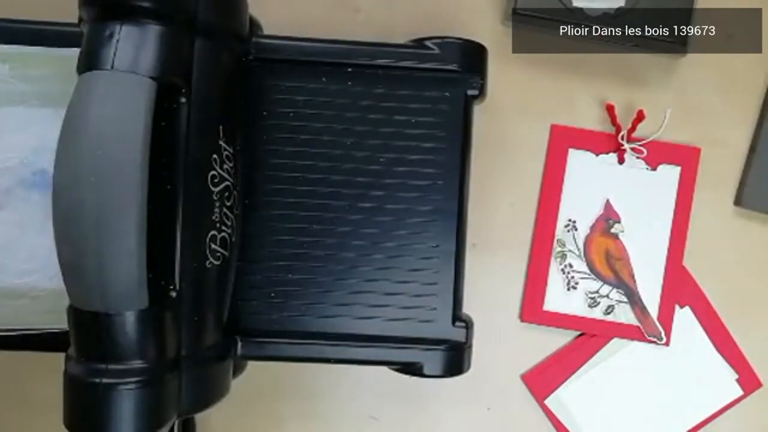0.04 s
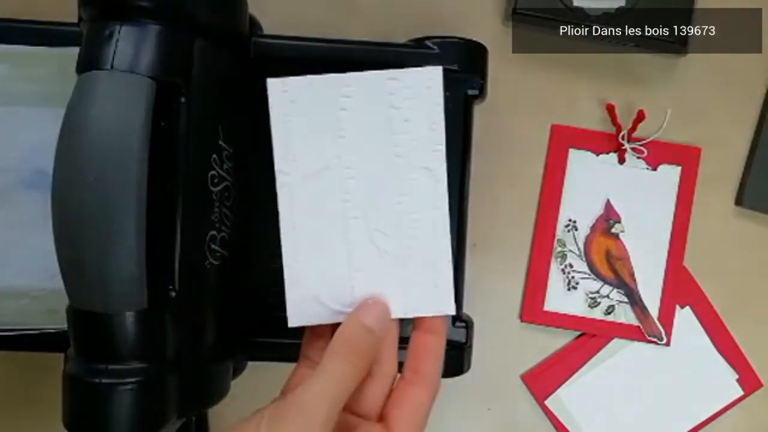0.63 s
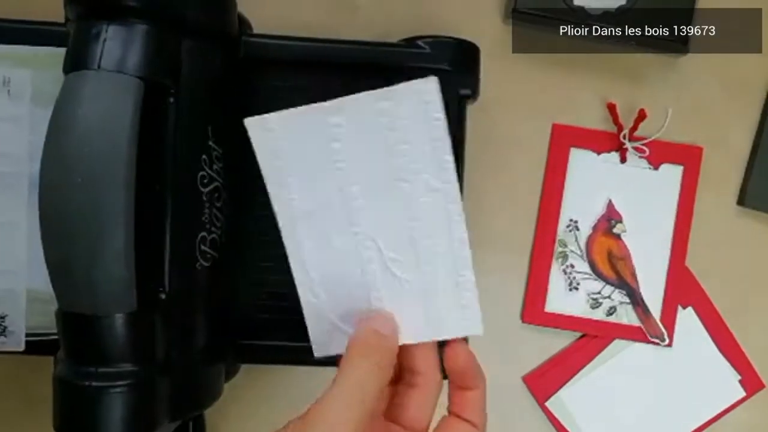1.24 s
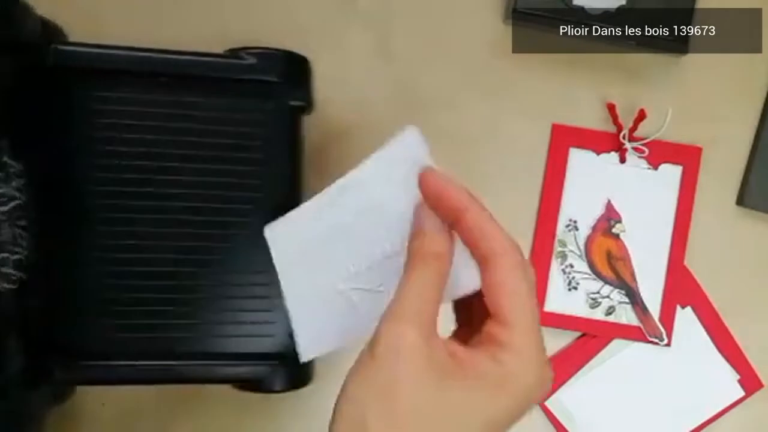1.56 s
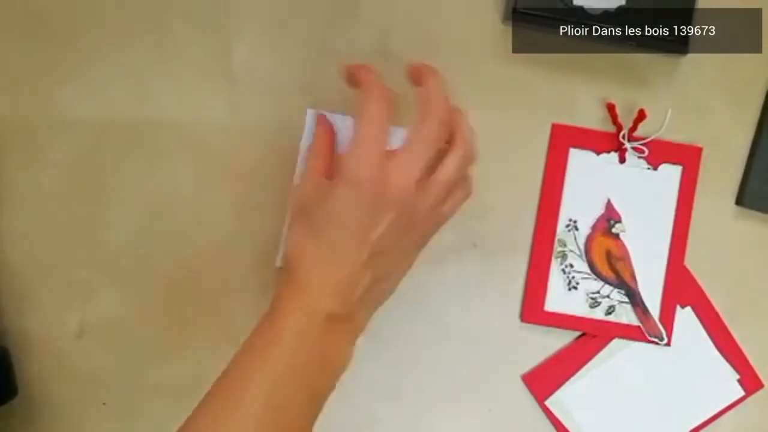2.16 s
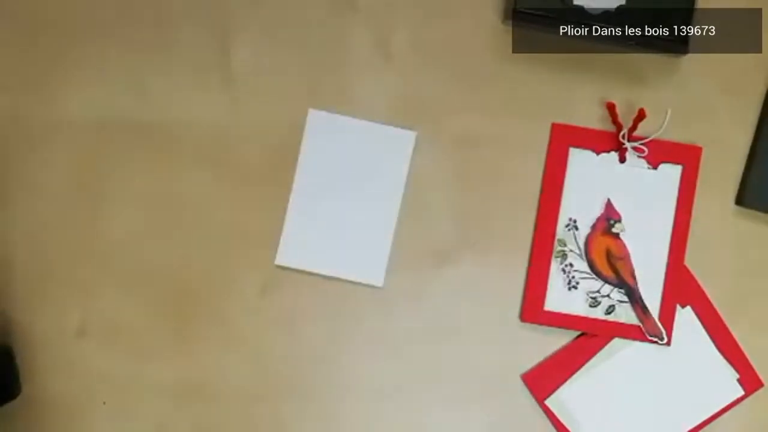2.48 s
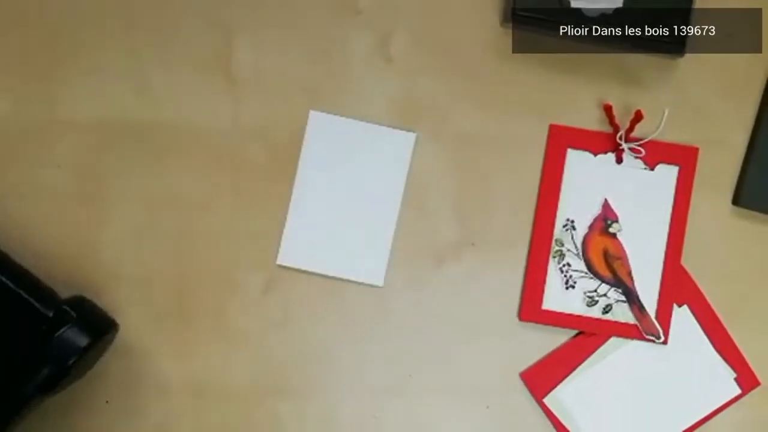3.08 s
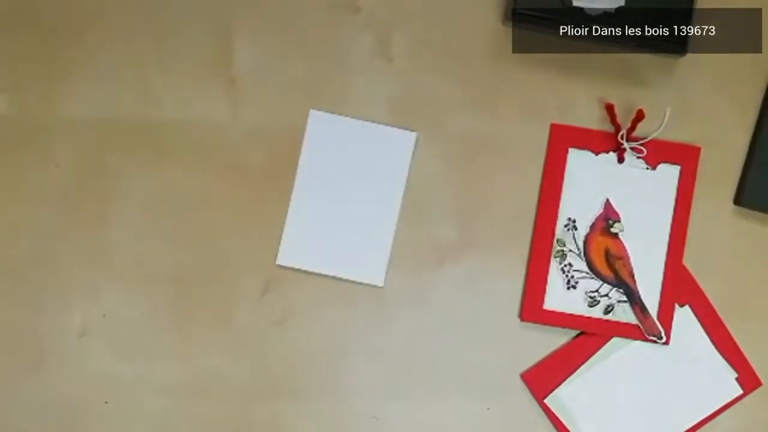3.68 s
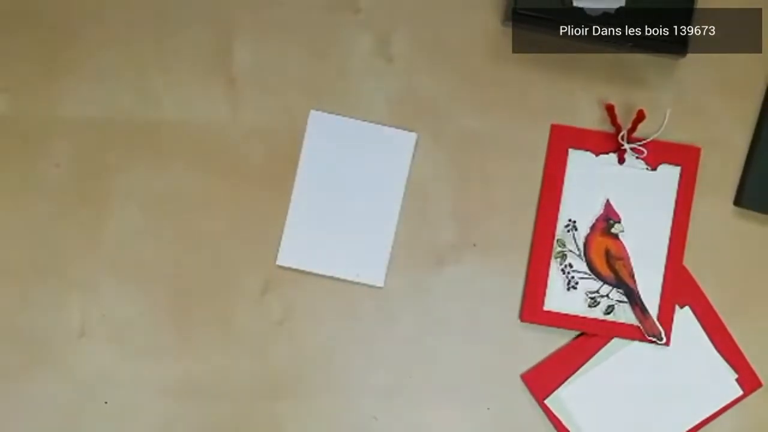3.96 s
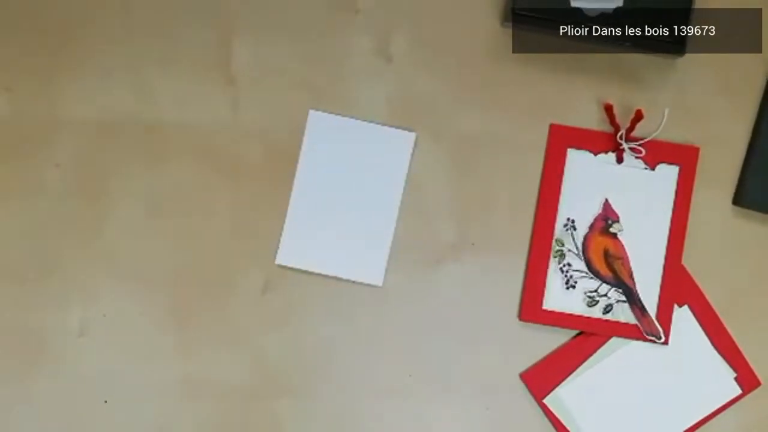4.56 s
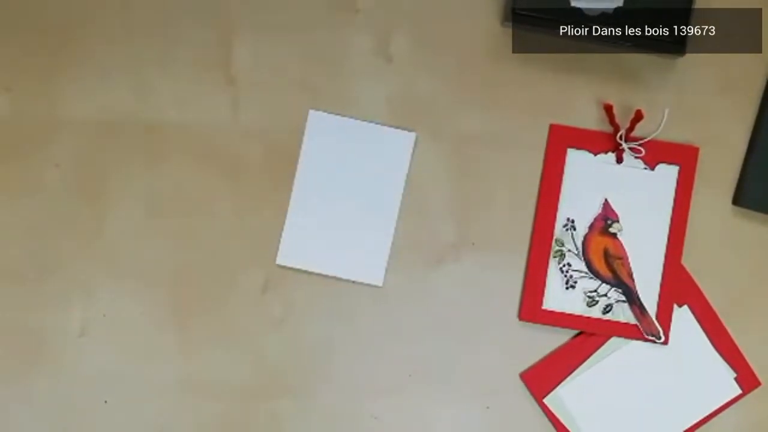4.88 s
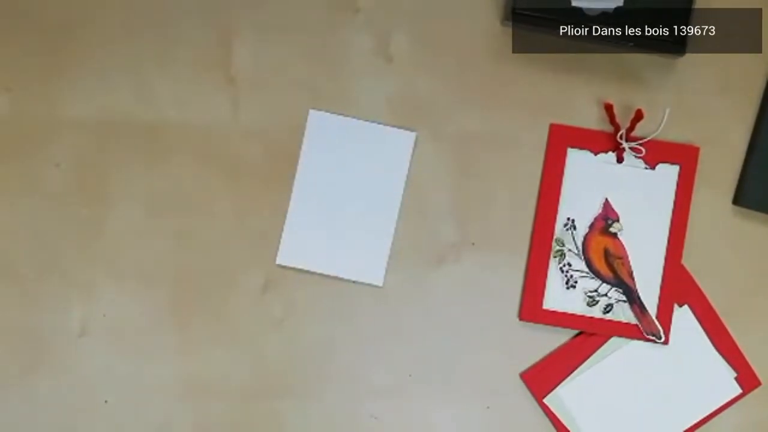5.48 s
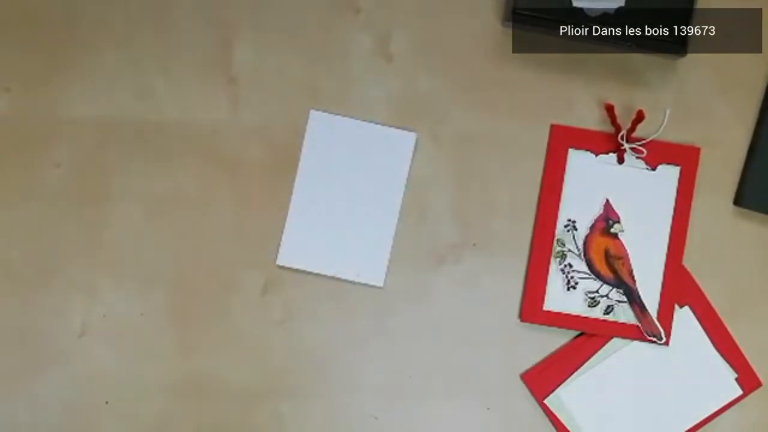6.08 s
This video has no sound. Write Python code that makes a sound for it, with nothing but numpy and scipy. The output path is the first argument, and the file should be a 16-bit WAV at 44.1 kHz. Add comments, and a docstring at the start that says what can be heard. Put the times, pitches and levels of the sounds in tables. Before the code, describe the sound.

In the first half second, stiff card rustles out of a folder close to the microphone, with several dry snaps. At about 0.7 seconds comes a sharp, clattering tap on the tray of a hollow plastic embossing machine, followed by lighter knocks and rattles. From 1.1 to 2.3 seconds its feet scrape across a wooden desk, swelling into a hiss. Around 2.6 seconds it thumps, its plates and crank clink, and a shorter scrape lasts until 3.2 seconds. Faint finger taps, scuffs and sleeve rustle follow as it is lifted, with a thin, faint squeak near 4.4 seconds. At about 4.7 seconds it is set down further away with a sharp clack and woody thud, the loudest sound, ringing briefly in the small, live room. Only a few faint scuffs and quiet room hiss remain until a little after 6 seconds.

```python
"""Embossing machine on a wooden desk

Close to the microphone, embossed card rustles out of its folder and is tapped on the machine's tray.
The hollow plastic machine knocks as it is gripped, its plates and crank rattle, and its feet scrape
over the desk. It is dragged off, lifted, and set down with a sharp clack further away in a small,
live room."""
import sys
import numpy as np
from scipy import signal
from scipy.fft import rfft, irfft
from scipy.io import wavfile
from scipy.ndimage import uniform_filter1d

SR = 44100
rng = np.random.default_rng(int(sys.argv[2]) if len(sys.argv) > 2 else 0)


def dump(signal):
    """Clip the signal to [-1, 1] and save it as 16-bit WAV at the path in sys.argv[1]."""
    limited = np.clip(np.atleast_2d(signal).T, -1, 1)
    pcm = np.round(limited * 32767).astype(np.int16)
    wavfile.write(sys.argv[1], SR, pcm)


N = 278712


# pushes across the desk: start/s, fastest/s, end/s, top speed/0-1, weight on the feet/dB, lean/s
PUSHES = [(1.141, 1.862, 2.287, 0.92, -0.5, 0.31), (2.654, 3.08, 3.23, 0.4, 2.5, 0.012)]
def pushes(knee_speed=0.28):
    """Speed and gains of drone, scrape and hiss: slow feet judder and drone, fast ones glide and hiss."""
    t, total_speed, gains = np.arange(N) / SR, np.zeros(N), np.zeros((3, N))
    for start, fastest, end, top_speed, weight_db, lean_s in PUSHES:
        speed = top_speed * arch(t, start, fastest, end) ** 1.02
        progress = np.interp(t, (start, end), (0, 1))
        lean = arch(t, start - lean_s, (start + end) / 2, end + lean_s)  # the hand bears down
        drone = amp(-61 - 10 * speed) * np.sqrt(lean)
        scrape = amp(-54 - 7 * progress) * speed ** 2 / (speed ** 2 + knee_speed ** 2)
        hiss = amp(-39) * speed ** 2.09
        gains += amp(weight_db) * np.array([drone, scrape, hiss])
        total_speed += speed
    return total_speed, gains


# spectra of the feet and of the grit under them, close up: f/Hz, level/dB
FEET_COLOUR = [(50, -7), (130, -18), (300, -11.5), (400, -9.5), (480, -10.5), (840, -1.5), (1180, -8.5),
               (1500, -12.5), (1750, -9), (2000, -14.5), (4500, -14), (7400, -8.5), (8200, -5), (8900, 3),
               (9400, -2), (10300, -9), (14400, -27)]
GRIT_COLOUR = [(300, -21), (700, -10), (1150, -2), (1800, -2), (2500, -1), (3500, -3), (8000, -26)]
def sliding_feet(drone, scrape, hiss):
    """The feet rub over the wood in dense slips; sparser grit roughens the scrape."""
    feet = rub((drone, scrape, hiss), FEET_COLOUR, (300, 1500),
               grains_per_s=20000, grain_db=1.3, flutter_db=0.9, ring_db=-53)
    grit = rub((0, scrape, 0), GRIT_COLOUR, (400, 3000),
               grains_per_s=450, grain_db=2.5, flutter_db=2.5, ring_db=-60)
    return feet + amp(-5) * grit


# resonances of the sliding shell: f/Hz, width/Hz, level over drone/dB, level over scrape/dB
HUM_MODES = [(179, 21, -3.5, -50), (388, 18, -11, -10.5), (1810, 190, -44, -27)]
def shell_hum(drone, scrape):
    """The juddering, scraping feet keep the shell ringing."""
    return sum(fuzzy_tone(hz, width) * (amp(drone_db) * drone + amp(scrape_db) * scrape)
               for hz, width, drone_db, scrape_db in HUM_MODES)


# feet and fingers catching, and the crank ringing on: t/s, length/s, level/dB, f/Hz, width/Hz
RASPS = [(0.0, 0.036, -58, 1503, 70), (0.161, 0.052, -63.5, 820, 200), (0.394, 0.047, -64, 847, 200),
         (1.325, 0.057, -50, 725, 120), (1.357, 0.079, -52.5, 620, 59), (1.36, 0.3, -61.5, 1690, 40),
         (1.381, 0.23, -54.5, 1992, 2100), (1.42, .15, -66, 830, 97), (1.56, 0.13, -59.5, 400, 5.2),
         (1.61, 0.1, -57, 1870, 120), (1.721, 0.11, -51.5, 1700, 43), (1.87, 0.23, -58, 1080, 640),
         (2.683, 0.048, -49, 2313, 70), (2.739, 0.061, -46, 830, 330), (4.579, 0.032, -56, 3500, 700),
         (4.683, 0.042, -41, 667, 300), (5.789, 0.049, -68, 751, 580)]
def rasps():
    """A foot or finger sticks and slips, or the crank rings on: a fuzzy resonance swells and fades."""
    out, t = np.zeros(N), np.arange(SR // 3) / SR
    for s, seconds, db, hz, width in RASPS:
        swell = np.sin(np.pi * np.clip(t / seconds, 0, 1))
        add(out, s, sized(swell * fuzzy_tone(hz, width, size=len(t)), db, span=seconds / 2))
    return out


# the machine set down edge first, away from the microphone: t/s, level/dB, contact/s
LANDING_BLOWS = [(4.7302, -24.5, 0.011), (4.7396, -14.5, 0.0045), (4.7452, -20, 0.0067),
                 (4.752, -24, 0.0078), (4.762, -29.5, 0.0029), (4.772, -33, 0.0048), (4.803, -26.5, 0.023)]
# spectrum of the clack: f/Hz, level/dB
CLACK_COLOUR = [(40, -10), (100, -9), (160, -21.5), (250, -9.5), (420, -4.5), (620, -2.5), (850, -1),
                (1100, -5.5), (1900, -2.5), (2600, -0.5), (3400, 0), (4600, -2.5), (7700, -1.5),
                (9100, 6.5), (10000, -8.5), (10900, -13), (14400, -26)]
def landing():
    """The heavy machine meets a hard surface in a few blows, with much of the room at this distance."""
    out, t = np.zeros(N), np.arange(SR // 4) / SR
    for s, db, seconds in LANDING_BLOWS:
        blow = touch(contact(t, seconds / 2), ring_db=-17, rise_s=seconds)
        add(out, s, sized(blow, db, span=0.0036))
    response = colour(CLACK_COLOUR)
    clack = through(out, response / np.linalg.norm(response))
    return room(clack, early_db=-5.5, early_t60=0.073, late_db=-4.5)


# the surface under the landing: f/Hz, level/dB, t60/s
SURFACE_MODES = [(406, -3.5, 0.27), (550, 6.5, 0.097), (804, -3, 0.13), (889, -9, .27), (1135, -10, .2),
                 (1480, -5, 0.14), (1685, -7, 0.099), (1886, -2, 0.15), (3362, -2, 0.185)]
def surface_thud(start_s=4.742, rise_s=0.002):
    """The surface answers with a woody thud as the full weight arrives."""
    out, t = np.zeros(N), np.arange(SR // 2) / SR
    add(out, start_s, sized(ringing(SURFACE_MODES, t) * (1 - np.exp(-t / rise_s)), db=-28))
    return room(out, early_db=-19, early_t60=0.084, late_db=-15)


# plates and shell knocking near the microphone: t/s, thud/dB, body/dB, crack/dB, relative rattle/dB
KNOCKS = [(0.7248, -35.5, -38.5, -46, -1), (0.915, -44.5, -44, -64.5, 0.5), (0.94, -48, -51.5, -69, -20),
          (1.141, -50.5, -54.5, -67.5, -13), (1.204, -57, -48.5, -61.5, -15),
          (1.238, -48.5, -46.5, -59.5, -24), (1.276, -52, -52.5, -70.5, -6), (1.324, -66, -51, -64.5, -11),
          (2.254, -57, -56.5, -79, -24), (2.349, -72, -63.5, -77, -26), (2.587, -55, -39, -52, -14),
          (2.7399, -63, -33.5, -51, -25), (2.776, -64, -49, -71, -29), (3.914, -51.5, -58.5, -63, -20)]
RATTLE_S = 0.017  # the chatter of loose parts peaks this long after a blow
def knocks(contact_s=0.0031, rebound_s=0.011, firm_db=-54.5):
    """The handled machine knocks, rattles and bounces once; harder knocks are brighter."""
    out, t = np.zeros(N), np.arange(SR // 4) / SR
    for s, thud_db, body_db, crack_db, rattle_db in KNOCKS:
        tick_db = crack_db + 11.5 + 0.49 * (crack_db - firm_db)
        force = contact(t, contact_s) + amp(rattle_db) * contact(t, RATTLE_S)
        for delay, db in (0, -0.5), (rebound_s, -8.5):
            blow = strike(force, (thud_db, body_db, crack_db, tick_db), ring_db=-12.5, rise_s=0.00029)
            add(out, s + delay, amp(db) * blow)
    return out


# the machine's weight rocking on the desk: t/s, level/dB, f/Hz, t60/s
DESK_THUMPS = [(0.511, -51.5, 80, 0.17), (0.7257, -38.5, 101, 0.14), (0.726, -42.5, 249, 0.13),
               (0.728, -39, 428, .09), (0.7275, -37.5, 536, 0.098), (0.931, -48, 120, 0.13),
               (0.944, -39, 396.6, 0.19), (0.947, -47, 193, 0.22), (1.206, -45, 375, 0.14),
               (1.213, -46, 181, 0.46), (2.588, -42.5, 81.5, 0.16), (2.588, -37.5, 414, 0.1),
               (2.589, -40, 505, 0.094), (2.592, -36.5, 181.4, 0.17), (2.743, -38, 163, 0.17),
               (3.906, -51.5, 133, 0.16), (4.746, -37, 115, 0.1), (4.747, -42, 158, 0.15)]
def desk_thumps(rise_s=0.002):
    """The desk top answers the weight with a short, low boom."""
    out, t = np.zeros(N), np.arange(SR // 3) / SR
    for s, db, hz, t60 in DESK_THUMPS:
        boom = ringing([(hz, 0, t60)], t) * (1 - np.exp(-t / rise_s))
        add(out, s, sized(boom, db))
    return room(out, early_db=-10, early_t60=0.06, late_db=-16)


# the stacked cutting plates and the crank handle: f/Hz, level/dB, t60/s
PLATE_MODES = [(465, 7, 0.029), (545.6, 5.5, 0.048), (690, -5, 0.11), (1040, -22, 0.077), (1304, 1, 0.037),
               (1620, -8, 0.072), (3050, -21.5, 0.14), (3420, -16.5, 0.12), (4220, -24, .12)]
CRANK_MODES = [(903, -1.5, 0.13), (2256, -10, 0.091), (2368, 4, .07), (3010, -4, 0.077), (3570, 0, 0.08),
               (3870, 0, 0.049)]
# their claps and clinks: t/s, level/dB, contact/s
PLATE_CLAPS = [(0.7284, -30, 0.00026), (0.916, -45, 0.00034), (1.325, -51.5, 0.00035),
               (2.5908, -52, 0.0002), (2.7411, -51, 0.0043), (2.758, -40, 0.0027), (2.776, -41.5, 0.00043),
               (2.797, -50, 0.0014), (2.824, -50, 0.0017)]
CRANK_CLINKS = [(2.252, -57.5, 0.0012), (2.523, -59, 0.0019), (2.571, -65, 0.0023), (2.589, -43, 0.0022),
                (2.692, -44.5, 0.011)]
def plates_and_crank():
    """Close to the microphone, the plates clap together and the loose crank clinks on its shaft."""
    parts = loose_part(PLATE_MODES, PLATE_CLAPS) + loose_part(CRANK_MODES, CRANK_CLINKS)
    return room(parts, early_db=-9, early_t60=0.04, late_db=-13)


# strokes of card on folder and fingers: t/s, hold/s, rustle/dB, hiss/dB
CARD_STROKES = [(-0.02, 0.012, -54.5, -47.5), (0.11, 0.15, -68, -54), (0.485, 0.026, -58.5, -59)]
# spectrum of rubbing card, close up: f/Hz, level/dB
CARD_COLOUR = [(120, -22), (180, -13), (313, -24), (395, -14), (517, -21.5), (753, -19.5), (1240, -21.5),
               (2890, -4), (6030, -4), (8940, 8), (14500, -15)]
def card_rustle():
    """Card rubs out of its folder in strokes that take hold quickly."""
    return rub(strokes(CARD_STROKES, rise_s=0.011), CARD_COLOUR, (1300,),
               grains_per_s=4200, grain_db=1, flutter_db=-1.5, ring_db=-57)


# snaps of the card's edge: t/s, level/dB
CARD_SNAPS = [(0.0932, -65), (0.111, -56), (0.2325, -41), (0.2483, -39.5), (0.2535, -42), (0.5124, -32),
              (0.547, -57), (0.5672, -45.5), (0.5825, -59)]
# spectrum of a snap: f/Hz, level/dB
SNAP_COLOUR = [(150, -18), (700, -21), (1500, -13.5), (3000, -15), (6000, -11), (7800, -5.5), (8900, 6.5),
               (10300, -6.5), (14400, -26)]
def card_snaps(contact_s=0.00046):
    """Stiff card snaps past the folder in dry ticks, close to the microphone."""
    out, t = np.zeros(N), np.arange(SR // 20) / SR
    for s, db in CARD_SNAPS:
        burst = flatten(contact(t, contact_s) * rng.standard_normal(len(t)))
        add(out, s, sized(through(burst, colour(SNAP_COLOUR)), db))
    return room(out, early_db=-7, early_t60=0.04, late_db=-18)


# card edge and fingernails on the plastic, close up: t/s, body/dB, tick/dB, contact/ms
CLICKS = [(0.01, -56, -52.5, 1.2), (0.029, -56.5, -77, 1.8), (0.464, -58.5, -63.5, 1.7),
          (0.512, -56, -38, 2.9), (0.567, -58, -57, 1.3), (0.727, -58, -30.5, 0.24),
          (0.737, -78, -35, 0.57), (0.744, -70, -40, 0.36), (2.1646, -56.5, -39.5, 2.9),
          (2.865, -55, -50.5, 2.6), (3.387, -60.5, -51, 1.8), (3.874, -60, -65, 2.7),
          (5.416, -79, -62, 2.4)]
def clicks():
    """A hard edge clicks on the shell, with a faint rattle after it."""
    out, t = np.zeros(N), np.arange(SR // 4) / SR
    for s, body_db, tick_db, contact_ms in CLICKS:
        force = contact(t, contact_ms / 1000) + amp(-25) * contact(t, RATTLE_S)
        levels_db = light_levels(body_db, tick_db, thud_over_body_db=-4)
        add(out, s, strike(force, levels_db, ring_db=-10.5, rise_s=0.0012))
    return out


# scuffs of card, fingers and plastic: t/s, body/dB, tick/dB, length/s
SCUFFS = [(0.09, -61, -50, 0.0078), (0.153, -61.5, -65, 0.014), (0.224, -55, -41, 0.03),
          (0.241, -58.5, -45, 0.017), (0.384, -54.5, -72, 0.068), (0.694, -55, -91, 0.041),
          (1.617, -77, -41, 0.052), (2.156, -65, -43.5, 0.017), (2.42, -76, -57.5, 0.087),
          (2.571, -53.5, -62, 0.028), (2.687, -46, -35.5, 0.057), (3.108, -57.5, -48, 0.12),
          (3.365, -66, -68, 0.016), (4.327, -57, -60, .11), (4.565, -51.5, -48, 0.27),
          (4.681, -43, -39, 0.1), (5.407, -78, -49.5, 0.093), (5.967, -97, -55, 0.15)]
def scuffs():
    """A soft, glancing touch on the shell swells and fades."""
    out, t = np.zeros(N), np.arange(SR // 4) / SR
    for s, body_db, tick_db, seconds in SCUFFS:
        rise_s = seconds / 4
        levels_db = light_levels(body_db, tick_db, thud_over_body_db=-11)
        add(out, s, strike(contact(t, rise_s), levels_db, ring_db=-13, rise_s=rise_s))
    return out


# fingers on the hollow casing: t/s, ring/dB, f/Hz, click/dB
FINGER_TAPS = [(0.607, -57, 776, -79), (2.496, -61, 670, -64), (2.524, -57.5, 943, -61),
               (3.211, -58.5, 930, -62), (3.239, -52, 538, -70), (3.339, -63.5, 856, -64),
               (3.508, -56.5, 810, -59), (3.553, -54, 887, -58.5), (3.673, -63.5, 856, -77),
               (3.915, -54, 743, -65.5), (3.986, -72, 920, -59), (4.075, -69.5, 965, -61),
               (4.138, -64.5, 1710, -77), (4.263, -70.5, 1290, -63), (4.451, -63, 880, -65.5),
               (4.481, -59.5, 667, -72), (4.56, -61.5, 844, -59)]
# modes of a tapped panel: multiple of f, level/dB
PANEL_MODES = [(.69, -9), (1, 0), (1.17, -7), (1.52, -10)]
# spectrum of a fingertip's click: f/Hz, level/dB
TAP_COLOUR = [(150, -8.5), (600, 2.5), (1200, -2), (2200, -8), (3400, -5.5), (5000, -18), (7500, -12),
              (9000, -7), (10500, -20), (14400, -28)]
def finger_taps(t60=0.075, contact_s=0.0037):
    """A fingertip rings one panel of the casing for a moment, with a dry click."""
    out, t = np.zeros(N), np.arange(SR // 5) / SR
    for s, ring_db, hz, click_db in FINGER_TAPS:
        ring = ringing([(hz * multiple, db, t60) for multiple, db in PANEL_MODES], t)
        click = through(contact(t, contact_s) * rng.standard_normal(len(t)), colour(TAP_COLOUR))
        add(out, s, sized(ring, ring_db) + sized(click, click_db))
    return room(out, early_db=-8, early_t60=0.06, late_db=-11)


def grip_squeak(start_s=4.347, hz=10800, half_width_hz=300, db=-51, t60=0.4):
    """Plastic slips in the grip: a thin, fuzzy whistle that dies away."""
    out, t = np.zeros(N), np.arange(SR // 3) / SR
    blur = signal.butter(3, half_width_hz, fs=SR, output="sos")
    real, imaginary = signal.sosfilt(blur, rng.standard_normal((2, len(t))))
    whistle = evened(((real + 1j * imaginary) * np.exp(2j * np.pi * hz * t)).real)
    add(out, start_s, whistle * amp(db - 60 * t / t60))
    return out


# hands and sleeves, further from the microphone: t/s, hold/s, rustle/dB, hiss/dB
SLEEVE_STROKES = [(3.2, 0.66, -74, -70.5), (3.88, 0.77, -69, -67), (4.3, 0.63, -65.5, -66),
                  (5.55, 0.61, -84.5, -73), (6.25, 0.1, -79, -60)]
# their spectrum: f/Hz, level/dB
SLEEVE_COLOUR = [(150, -26.5), (300, -7), (420, -0.5), (900, 1.5), (1100, -12), (2100, -11.5),
                 (3500, -11.5), (5600, -16.5), (7600, -16), (8950, -1), (10300, -13.5), (14400, -29)]
def hands_and_sleeves():
    """Hands and sleeves rub softly as they change their hold on the machine."""
    return rub(strokes(SLEEVE_STROKES, rise_s=0.06), SLEEVE_COLOUR, (1300,),
               grains_per_s=5000, grain_db=-0.5, flutter_db=3.5, ring_db=-65.5)


# the hollow plastic shell: f/Hz, level/dB, t60/s
SHELL_MODES = [(86.7, 7, 0.11), (129, -1, 0.044), (175, 2, 0.67), (399, 4, 0.22), (525.5, 7, 0.12),
               (628.5, 11, 0.051), (699, 3.5, 0.17), (774, 2, 0.18), (871.5, -2, 0.6), (1100, -16, 0.17),
               (1312, -5, 0.23), (1704, 4.5, 0.038), (2286, 5, 0.19), (3525, 1.5, 0.15), (3870, 1.5, 0.12),
               (4350, -5, 0.13), (5850, -9, 0.21), (7740, -1, 0.092)]
def shell(spot_db=0):
    """The shell rings after a touch; spot_db lets each spot favour other modes."""
    t = np.arange(SR // 4) / SR
    spots = rng.uniform(-0.68, 1, (len(SHELL_MODES), 2))
    return sum(amp(db + spot_db * share - 60 * t / t60) * np.cos(2 * np.pi * hz * t + np.pi * turn)
               for (hz, db, t60), (share, turn) in zip(SHELL_MODES, spots))


# spectrum of a blow near the microphone: f/Hz, level/dB
BLOW_COLOUR = [(40, -6.5), (90, 2.5), (200, -2), (330, 1.5), (600, 5.5), (1100, 0.5), (2000, 2), (3500, 1),
               (6500, -9.5), (7800, -6), (9000, 3.5), (10200, -10), (12500, -19.5), (14500, -29)]
def strike(force, levels_db, ring_db, rise_s):
    """A near touch in four bands: thud, body, crack and tick."""
    blow = through(touch(force, ring_db, rise_s), colour(BLOW_COLOUR))
    return sum(sized(band, db) for band, db in zip(split(blow, (250, 1200, 6500)), levels_db))


def light_levels(body_db, tick_db, thud_over_body_db):
    """Thud, body, crack and tick levels of a light touch."""
    crack_db = body_db + 0.28 * (tick_db - body_db) - 0.5
    return body_db + thud_over_body_db, body_db, crack_db, tick_db


def touch(force, ring_db, rise_s, grip_t60=0.3):
    """A burst of rough contact, and the shell ringing under it, damped by the hand."""
    t = np.arange(len(force)) / SR
    burst = flatten(force * rng.standard_normal(len(t)))
    ring = shell(spot_db=3)[:len(t)] * (1 - np.exp(-t / rise_s)) * amp(-60 * t / grip_t60)
    return sized(burst, 0) + sized(ring, ring_db)


def loose_part(modes, hits):
    """A loose part rings with its own modes; a longer contact is a run of tiny bounces."""
    out, t = np.zeros(N), np.arange(SR // 3) / SR
    ring = ringing(modes, t)
    for s, db, seconds in hits:
        bounces = flatten(flatten(contact(t, seconds) * rng.standard_normal(len(t))))
        add(out, s, sized(through(bounces, ring), db))
    return out


def rub(gains, spectrum, edges_hz, grains_per_s, grain_db, flutter_db, ring_db):
    """Tiny slips of uneven size excite the shell; each band follows its own gain."""
    sizes = amp(grain_db * np.minimum(rng.exponential(1, N), 5)) * rng.standard_normal(N)
    flutter = evened(uniform_filter1d(uniform_filter1d(rng.standard_normal(N), size=700), size=400))
    slips = sizes * (rng.random(N) < grains_per_s / SR) * amp(flutter_db * flutter)
    sound = through(slips + amp(ring_db) * through(slips, shell()), colour(spectrum))
    return sum(evened(band) * gain for band, gain in zip(split(sound, edges_hz), gains))


def strokes(rows, rise_s, fade_db_per_s=189):
    """Gains of rustle and hiss over time: each stroke rises, holds and fades."""
    t, gains = np.arange(N) / SR, np.zeros((2, N))
    for s, hold, *levels_db in rows:
        shape = np.clip((t - s) / rise_s, 0, 1) * amp(-fade_db_per_s * np.maximum(t - s - hold, 0))
        gains = np.maximum(gains, amp(levels_db)[:, None] * shape)
    return gains


def shifting_echoes(near, speed, turns_per_s=2.76):
    """The desk's echo pattern changes as the machine travels, by turns_per_s at speed 1."""
    travel = 2 * np.pi * turns_per_s * np.cumsum(speed) / SR
    return sum(room(part, early_db=-4, early_t60=0.02, late_db=-17) - part
               for part in (near * np.cos(travel), near * np.sin(travel)))


# decay of the small, live room: f/Hz, t60/s
ROOM_DECAY = [(100, 0.82), (300, 0.58), (1000, 0.71), (2500, 0.59), (5000, 0.52), (9000, 0.43),
              (14000, 0.4)]
def room(x, early_db, early_t60, late_db):
    """The microphone hears the direct sound, quick echoes from desk and furniture, and the tail."""
    t = np.arange(SR) / SR
    hz, s, noise = signal.stft(rng.standard_normal(SR), SR, nperseg=256)
    late = signal.istft(noise * amp(-60 * s / read(ROOM_DECAY, hz)[:, None]), SR, nperseg=256)[1][:SR]
    late *= np.clip((t - 0.004) / 0.0082, 0, 1)
    early = rng.standard_normal(SR) * (rng.random(SR) < 2500 / SR)
    early *= (t > 0.0015) * amp(-60 * t / early_t60)
    echoes = amp(early_db) * early / np.linalg.norm(early) + amp(late_db) * late / np.linalg.norm(late)
    return x + through(x, echoes)


# spectrum of the still room at the microphone: f/Hz, level/dB
ROOM_TONE_COLOUR = [(12, -33.5), (20, 2.5), (62, 4), (114, 1.5), (181, -3.5), (463, -5), (662, -6.5),
                    (922, -7), (1030, -14.5), (3660, -16), (6700, -15.5), (9080, -4), (10400, -13),
                    (14500, -21.5)]
def room_tone(db=-65.5):
    """Quiet room air and microphone hiss."""
    return amp(db) * evened(through(rng.standard_normal(N), colour(ROOM_TONE_COLOUR)))


def contact(t, seconds):
    """The force of a touch: a quick rise and a fall."""
    u = t / max(seconds, 0.0003)
    return u * np.exp(1 - u)


def ringing(modes, t):
    """Modes that start together and die away."""
    return sum(amp(db - 60 * t / t60) * np.sin(2 * np.pi * hz * t) for hz, db, t60 in modes)


def fuzzy_tone(hz, width_hz, size=N):
    """A narrow resonance kept ringing by friction."""
    blur = signal.butter(2, width_hz / 2, fs=SR, output="sos")
    real, imaginary = signal.sosfilt(blur, rng.standard_normal((2, size)))
    phase = 2 * np.pi * hz * np.arange(size) / SR
    return evened(real * np.cos(phase) - imaginary * np.sin(phase))


def arch(t, start, middle, end):
    """Rises from 0 at start to 1 at middle and falls back to 0 at end."""
    return np.sin(np.pi / 2 * np.interp(t, (start, middle, end), (0, 1, 0)))


def flatten(x):
    """Evens out a burst's spectrum, so that what it strikes gives it colour."""
    height = evened(abs(rfft(x, 2 * len(x))))
    return through(x, causal(1 / np.hypot(height, 0.5)))


def colour(points, size=2048):
    """Impulse response with the given spectrum."""
    return causal(amp(read(points, np.fft.rfftfreq(size, 1 / SR))))


def causal(gain):
    """The quickest causal impulse response with these gains."""
    cepstrum = irfft(np.log(gain))
    half = len(cepstrum) // 2
    cepstrum[1:half] *= 2
    cepstrum[half + 1:] = 0
    return irfft(np.exp(rfft(cepstrum)))


def split(x, edges_hz):
    """Cuts a sound into bands at the given edges, lowest first."""
    bands = []
    for hz in edges_hz:
        bands.append(signal.sosfilt(signal.butter(4, hz, "low", fs=SR, output="sos"), x))
        x = signal.sosfilt(signal.butter(4, hz, "high", fs=SR, output="sos"), x)
    return bands + [x]


def read(points, hz):
    """Reads a curve on a log-frequency axis."""
    f, value = np.transpose(points)
    return np.interp(np.log(hz + 1), np.log(f + 1), value)


def through(x, response):
    """Convolves and keeps the length."""
    return signal.fftconvolve(x, response)[:len(x)]


def sized(x, db, span=0.0075):
    """Gives a blow the energy of db held for span seconds."""
    return amp(db) * x * np.sqrt(span * SR / (np.sum(x ** 2) + 1e-20))


def evened(x):
    """Scales to rms 1."""
    return x / np.sqrt(np.mean(x ** 2) + 1e-20)


def amp(db):
    """Decibels to gain."""
    return 10 ** (np.asarray(db) / 20)


def add(mix, s, sound):
    """Mixes a sound in at s seconds."""
    part = mix[max(round(s * SR), 0):][:len(sound)]
    part += sound[:len(part)]


def scene():
    """All sources at one microphone beside the desk."""
    speed, (drone, scrape, hiss) = pushes()
    near = card_rustle() + sliding_feet(drone, scrape, hiss)
    hands = hands_and_sleeves()
    mix = near + shifting_echoes(near, speed)
    mix += room(hands, early_db=-4, early_t60=0.24, late_db=-20)
    mix += shell_hum(drone, scrape) + rasps() + card_snaps()
    mix += room(knocks() + clicks() + scuffs(), early_db=-3.5, early_t60=0.044, late_db=-7)
    mix += plates_and_crank() + desk_thumps() + finger_taps()
    mix += landing() + surface_thud() + grip_squeak() + room_tone()
    return mix[None]


def record(dry):
    """The recorder passes sound up to 14380 Hz."""
    lowpass = signal.firwin(301, 14380, window=("kaiser", 8), fs=SR)
    return signal.oaconvolve(dry, lowpass[None], "same")


dry = scene()
out = record(dry)
dump(out)
```